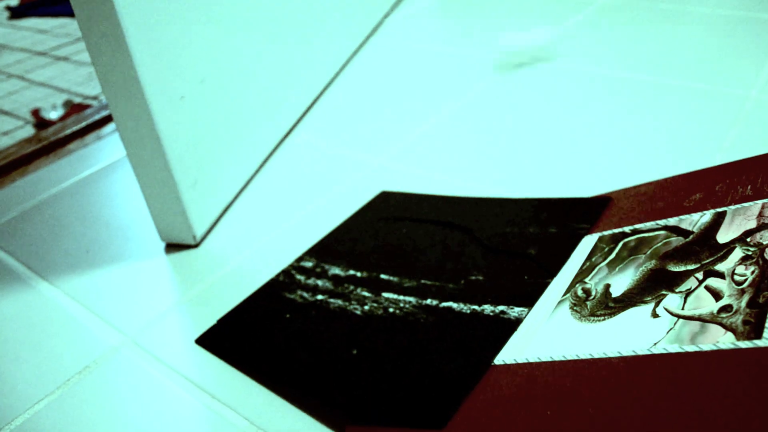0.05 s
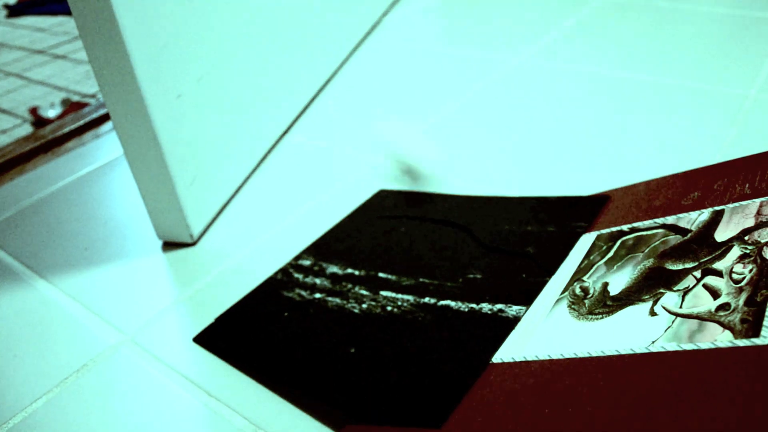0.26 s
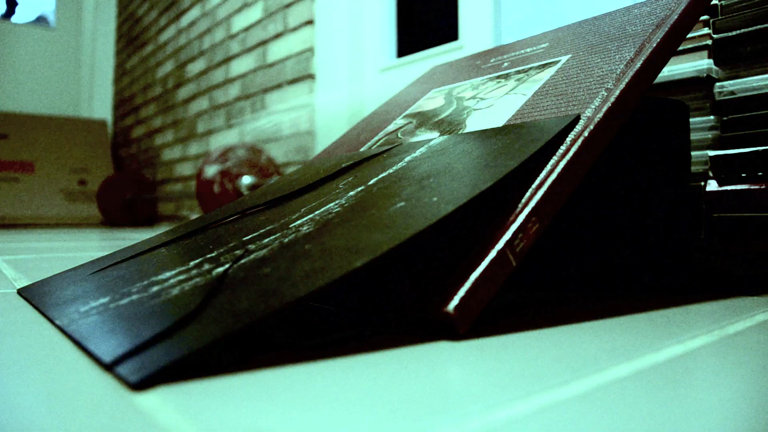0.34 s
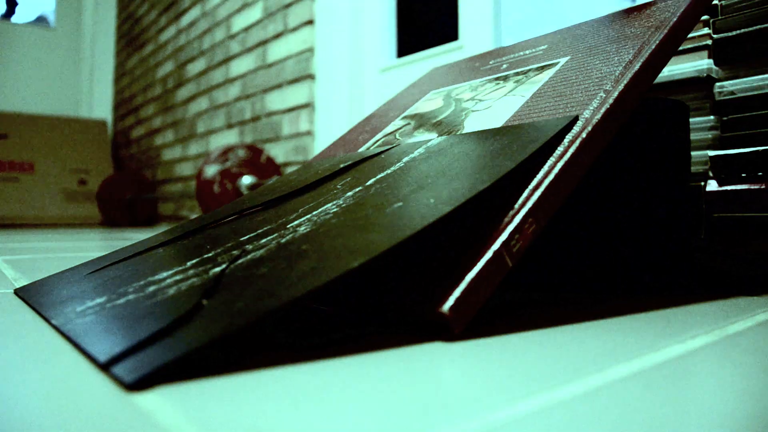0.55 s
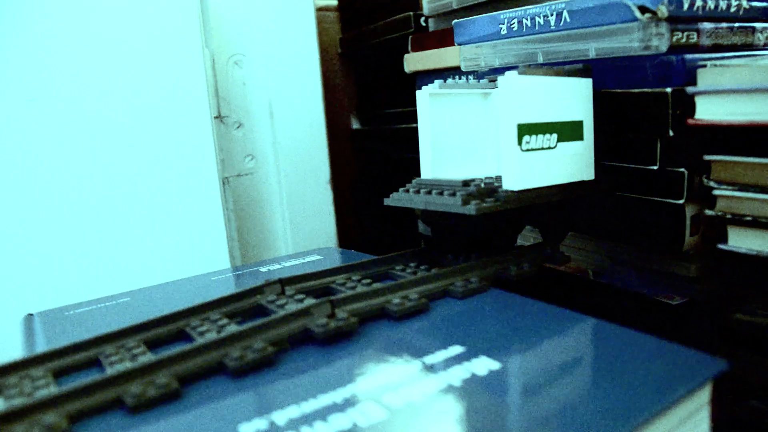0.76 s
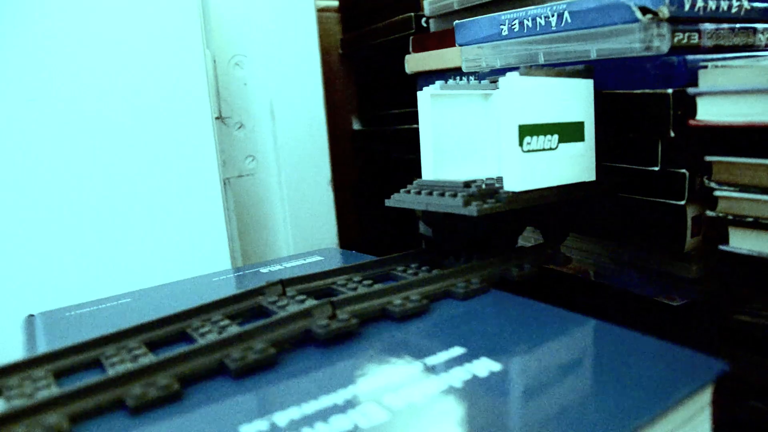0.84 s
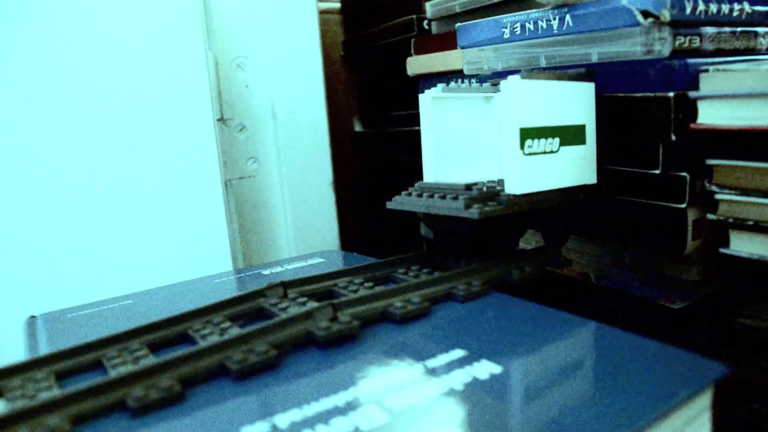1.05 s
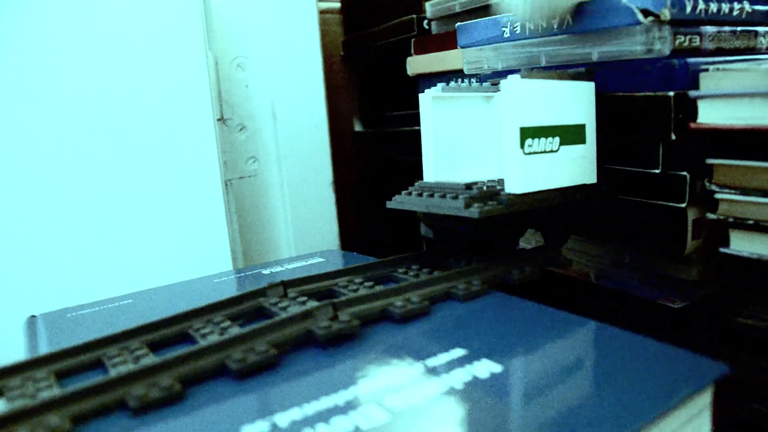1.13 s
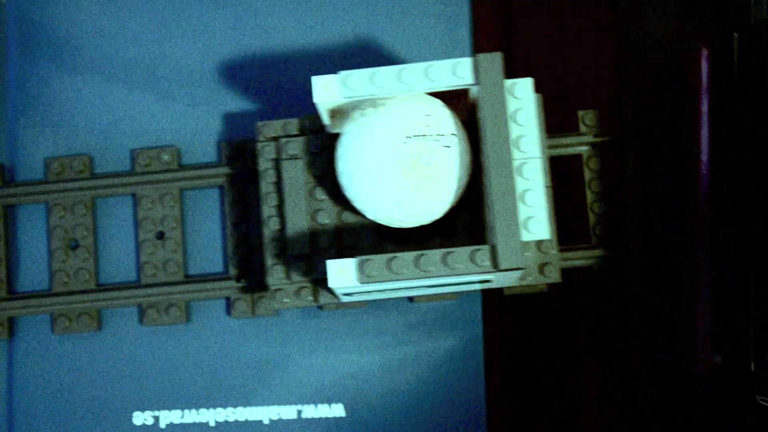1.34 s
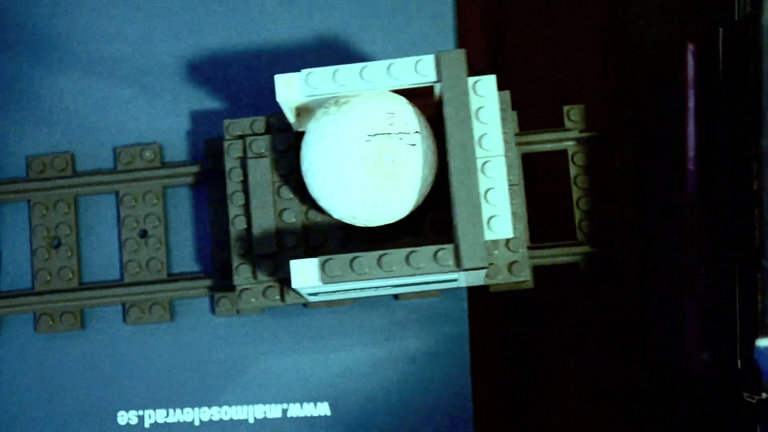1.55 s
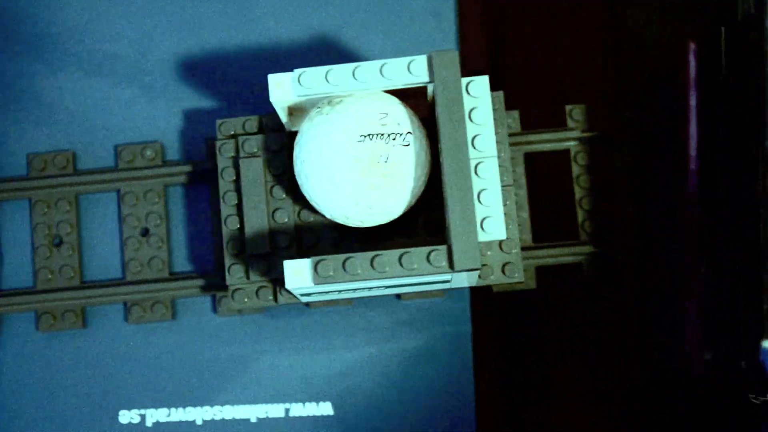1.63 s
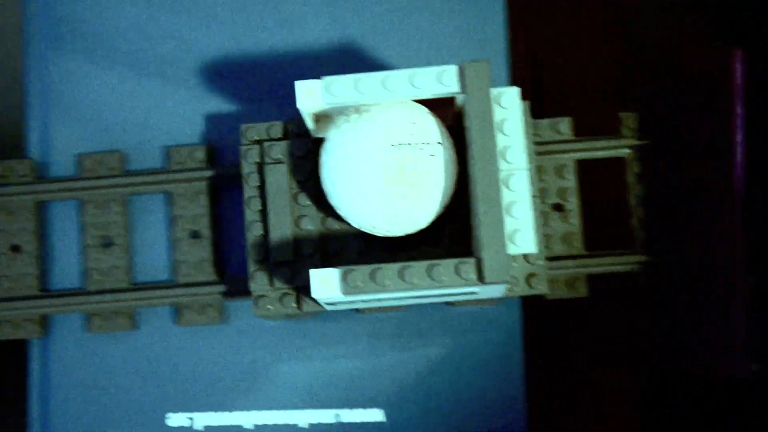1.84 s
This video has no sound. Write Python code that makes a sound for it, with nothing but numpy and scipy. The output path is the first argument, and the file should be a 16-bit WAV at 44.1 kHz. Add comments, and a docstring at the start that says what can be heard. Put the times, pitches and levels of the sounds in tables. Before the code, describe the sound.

A light ball bounces hard on a tiled floor, knocks and thumps on a ramp of books, then rattles briefly into a plastic toy wagon. The room reverberates, and the loudest blows overload a small microphone.

```python
"""A light ball bounces hard on a tiled floor, knocks on a ramp of books and rattles in a plastic toy wagon.
Each impact is a contact pulse with a spray of dense vibration; some also excite the damped modes of ball,
ramp, plastic bricks or room. Reverberation follows, and three times the ringing is cut short. Faint air
noise, mains hum and a thin whine lie beneath. The loudest blows overload a small microphone."""
import sys
import numpy as np
from scipy import signal
from scipy.fft import rfft, irfft
from scipy.io import wavfile

SR = 44100
rng = np.random.default_rng(int(sys.argv[2]) if len(sys.argv) > 2 else 0)


def unload_audio(sound):
    """Save the sound as a 16-bit wav file, at the path given as the first command line argument."""
    columns = np.transpose(np.atleast_2d(sound))
    # keep every value between -1 and 1, then stretch to whole-number steps
    steps = np.round(np.clip(columns, -1, 1) * 32767)
    wavfile.write(sys.argv[1], SR, steps.astype(np.int16))


N = 83790

FLOOR_END_S, RAMP_END_S, WAGON_END_S, FLOOR_FADE_S = 0.404, 0.801, 1.427, 0.013
# reverberation of the room and of the nook around the wagon (frequency [Hz], T60 [s])
ROOM_DECAY = [(100, 1), (350, 0.78), (800, 0.57), (2000, 0.51), (5500, 0.5), (9000, .38), (15000, 0.18)]
NOOK_DECAY = [(200, 0.35), (1400, 0.37), (13000, 0.18)]


def amp(db):
    """Amplitude grows tenfold every 20 dB."""
    return 10 ** (np.asarray(db) / 20)


def unit(x):
    """Normalisation to an energy of 1."""
    return x / np.sqrt(np.sum(x ** 2) + 1e-20)


def curve_at(points, hz):
    """Interpolation on a logarithmic frequency axis."""
    f, value = np.transpose(points)
    return np.interp(np.log(hz + 1), np.log(f + 1), value)


def add(mix, s, sound):
    """Superposition: the sound joins the mix at time s."""
    part = mix[max(round(s * SR), 0):][:len(sound)]
    part += sound[:len(part)]


def until(s, fade_s=0.0012):
    """Gating: a gain that falls linearly from 1 to 0 around time s."""
    return np.clip((s - np.arange(N) / SR) / fade_s + .5, 0, 1)


def hiss(colour):
    """Spectral shaping of white noise, at an rms of 1."""
    gain = amp(curve_at(colour, np.fft.rfftfreq(N, 1 / SR)))
    return unit(irfft(rfft(rng.standard_normal(N)) * gain, N)) * np.sqrt(N)


def contact_pulse(colour, size=4096):
    """Minimum phase gives the shortest causal pulse with a given spectrum."""
    log_gain = np.log(amp(curve_at(colour, abs(np.fft.fftfreq(size, 1 / SR)))))
    spectrum = np.exp(np.conj(signal.hilbert(log_gain)))
    return unit(np.fft.ifft(spectrum).real[:size // 2])


def ring(modes):
    """Free vibration: a struck body sums damped sines and radiates little below its lowest mode."""
    t = np.arange(SR) / SR
    x = sum(amp(db - 60 * t / t60) * np.sin(2 * np.pi * hz * t) for hz, db, t60 in modes)
    return unit(signal.lfilter(*signal.butter(2, modes[0][0] / 2, "high", fs=SR), x))


def spray(t60):
    """Modal overlap: dense vibration merges into a short, spectrally flat noise."""
    fade = amp(-60 * np.arange(SR) / SR / t60)
    spectrum = rfft(rng.standard_normal(SR) * fade)
    whitened = irfft(spectrum / (abs(spectrum) + 1e-12), SR)
    return unit(whitened * np.sqrt(fade))


def diffuse_tail(decay, build_s=0.0017):
    """A diffuse field builds quickly, then dies exponentially, each band at its own rate."""
    hz, t, bands = signal.stft(rng.standard_normal(SR), SR, nperseg=256)
    bands = bands * amp(-60 * t / curve_at(decay, hz)[:, None])
    tail = signal.istft(bands, SR, nperseg=256)[1][:SR]
    return tail * (1 - np.exp(-np.arange(SR) / SR / build_s))


def strike(blows, colour, decay, room_db, spray_s, spray_db,
           dull_hz=SR / 3, modes=None, ring_db=0, echoes=(), spread=0):
    """Impact response: pulse, spray and modes form the direct sound; its reflections are duller."""
    out, contact = np.zeros(N), contact_pulse(colour)
    absorption = signal.butter(1, dull_hz, fs=SR)
    for s, db in blows:
        direct = amp(spray_db) * unit(signal.fftconvolve(spray(spray_s), contact)[:SR])
        add(direct, 0, contact)
        direct = unit(direct)
        if modes:
            detuned = [(hz * (1 + spread * rng.standard_normal()), level, t60)
                       for hz, level, t60 in modes]
            direct = unit(direct + amp(ring_db) * ring(detuned))
        reverb = signal.fftconvolve(diffuse_tail(decay), contact)[:SR]
        reverb = unit(signal.lfilter(*absorption, reverb))
        gain = amp(db) * np.sqrt(SR / 100)  # level as if the direct energy filled 10 ms
        add(out, s, gain * (direct + amp(room_db) * reverb))
        for delay, echo_db in echoes:
            direct = signal.lfilter(*absorption, direct)
            add(out, s + delay, gain * amp(echo_db) * direct)
    return out


def room_air():
    """Broadband ambient noise, which steps down as the floor's and the wagon's ringing end."""
    # noise spectra, early and late (frequency [Hz], relative density [dB])
    early_colour = [(40, -4.5), (500, 2), (1460, -13.5), (3100, -11), (5300, -27), (9600, -21.5),
                    (15000, -43.5)]
    late_colour = [(30, -36.5), (90, 0.5), (160, -12.5), (280, -7), (900, -14.5), (1350, -11.5),
                   (2200, -15), (3500, -21.5), (5000, -24.5), (15000, -40.5)]
    opening, ending = until(FLOOR_END_S, FLOOR_FADE_S), 1 - until(WAGON_END_S)
    early = amp(-49) * hiss(early_colour) * opening
    late = amp(-59 - ending) * hiss(late_colour) * (1 - opening)
    return early + late


def electrical_tones():
    """Pure tones: steady mains hum and a thin whine that jumps in pitch, then stops."""
    # hum and whines (start [s], end [s], frequency [Hz], rms level [dB])
    tones = [(0, 1.9, 100, -71), (0, .39, 14200, -78), (.39, .8, 11790, -73), (.8, 1.427, 15719, -66)]
    out = np.zeros(N)
    for start, end, hz, db in tones:
        gate = until(end) - until(start)
        out += gate * amp(db) * np.sqrt(2) * np.sin(2 * np.pi * hz * np.arange(N) / SR)
    return out


def faint_ticks():
    """Brief contacts have broad spectra and are heard as ticks."""
    # contacts (time [s], level [dB])
    blows = [(.035, -52), (.0928, -41.5), (.2058, -37.5), (.3478, -38.5)]
    # contact spectrum (frequency [Hz], level [dB])
    colour = [(150, -11), (700, 14), (1400, -1), (3300, -3.5), (5300, -7), (7500, -2.5), (10500, -0.5),
              (15000, -29)]
    return strike(blows, colour, ROOM_DECAY, room_db=-1.5, spray_s=0.014, spray_db=2)


def floor_bounce():
    """The ball slams on the tiles, exciting early reflections and the room's standing waves."""
    # impact (time [s], level [dB])
    blows = [(0.2245, -4)]
    # contact spectrum (frequency [Hz], level [dB])
    colour = [(60, -34.5), (180, -18), (370, -10), (720, 2), (1150, -3), (1600, -16), (3300, -25.5),
              (5200, -39.5), (9000, -34), (15000, -58)]
    # ever duller reflections from door and walls (delay [s], gain [dB])
    echoes = [(.0062, 6), (.0082, 0.5), (.0217, -5), (.0296, -8), (.0455, -16), (.0635, -12), (.074, -10.5)]
    # standing waves (frequency [Hz], relative level [dB])
    room_modes = [(118, -24.5), (238, -15.5), (370, -9.5), (500, -1.5), (535, -4.5), (644, -2), (767, -1),
                  (882, -6), (944, -13.5), (1008, -9.5), (1096, -15), (1272, -11.5)]
    out = strike(blows, colour, ROOM_DECAY, room_db=1, spray_s=0.015, spray_db=1.5,
                 dull_hz=5500, echoes=echoes)
    resonance = ring([(hz, db, curve_at(ROOM_DECAY, hz)) for hz, db in room_modes])
    add(out, blows[0][0], amp(26) * resonance)
    return -out  # inverted polarity


def distant_knocks():
    """Beyond the critical distance, reverberation outweighs the direct sound."""
    # impacts (time [s], level [dB])
    blows = [(.366, -21), (.378, -14)]
    # contact spectrum (frequency [Hz], level [dB])
    colour = [(50, -30), (110, -17.5), (330, -8.5), (520, 7.5), (750, -1.5), (3300, -13.5), (4300, -23.5),
              (5600, -20.5), (9000, -27.5), (13000, -49)]
    return strike(blows, colour, ROOM_DECAY, room_db=4, spray_s=0.054, spray_db=33)


def ramp_thump(rebound_s=0.5332):
    """Heavy damping makes the books thump; a soft rebound stirs only their two lowest modes."""
    # impact (time [s], level [dB])
    blows = [(.4741, -6)]
    # contact spectrum (frequency [Hz], level [dB])
    colour = [(120, -23.5), (240, -1), (480, 2.5), (900, -7), (2000, -11.5), (5000, -21.5), (9500, -28),
              (15000, -55)]
    # ramp resonances (frequency [Hz], relative level [dB], T60 [s])
    modes = [(251, -3, 0.0363), (609, 4, 0.035), (1190, -5.5, .055)]
    out = strike(blows, colour, ROOM_DECAY, room_db=-5.5, spray_s=0.024, spray_db=15.5,
                 dull_hz=3800, modes=modes, ring_db=2)
    add(out, rebound_s, amp(8.5) * ring(modes[:2]))
    return out


def hard_clack():
    """A hard contact also excites high modes, which decay faster than the low ones."""
    # impact (time [s], level [dB])
    blows = [(.7057, -13)]
    # contact spectrum (frequency [Hz], level [dB])
    colour = [(50, -23.5), (260, 2.5), (700, 2), (1300, -8), (3300, -7), (4200, -12.5), (5000, -8.5),
              (7700, -20), (11000, -38.5)]
    # resonances (frequency [Hz], relative level [dB], T60 [s])
    modes = [(242.3, -12.5, .2), (305.5, -11, .2), (730, -2.5, 0.081), (3190, -8, .015), (4840, 0, 0.01207),
             (5350, -1.5, .012)]
    return strike(blows, colour, ROOM_DECAY, room_db=-0.5, spray_s=0.022, spray_db=13.5,
                  dull_hz=9480, modes=modes, ring_db=0.5)


def light_tap(tap_s=1.1515):
    """A soft touch is heard as free vibration alone, with no click."""
    # resonances (frequency [Hz], relative level [dB], T60 [s])
    modes = [(285, 1, 0.06), (1226, 2.5, 0.048), (2220, -2.5, 0.037)]
    out = np.zeros(N)
    add(out, tap_s, amp(-20) * ring(modes))
    return out


def ball_rattle():
    """The hollow ball's resonance rises as it settles in the wagon; soft knocks ring more than click."""
    # impacts (time [s], level [dB])
    blows = [(1.2483, -13.5), (1.2513, -17.5), (1.2624, -22), (1.279, -25.5), (1.2871, -32),
             (1.2944, -34.5), (1.3356, -24.5), (1.358, -29.5), (1.375, -31), (1.3881, -25.5)]
    # contact spectrum (frequency [Hz], level [dB])
    colour = [(220, -25), (420, -2.5), (800, -16), (1300, 5), (2000, -3.5), (2900, -13.5), (10000, -17.5),
              (15000, -37.5)]
    # course of the hollow ring (time [s], pitch [Hz], T60 [s])
    hollow_ring = [(1.2477, 1265, .032), (1.3882, 1470, .07)]
    # ball resonances (multiple of the pitch [1], relative level [dB])
    partials = [(1, 2), (1.19, -9), (2.8, -11)]
    out, hardest_db = np.zeros(N), max(db for s, db in blows)
    times, pitches, t60s = np.transpose(hollow_ring)
    for s, db in blows:
        hz, t60 = np.interp(s, times, pitches), np.interp(s, times, t60s)
        modes = [(multiple * hz, mode_db, t60) for multiple, mode_db in partials]
        out += strike([(s, db)], colour, NOOK_DECAY, room_db=-10, spray_s=0.044, spray_db=4.5,
                      modes=modes, ring_db=0.5 * (hardest_db - db))
    return out


def brick_clatter():
    """Plastic bricks in the wagon resonate; each blow hits another, with slightly different pitches."""
    # impacts (time [s], level [dB])
    blows = [(1.2735, -27.5), (1.3043, -13), (1.3074, -19.5), (1.312, -20.5), (1.3348, -29.5), (1.338, -27),
             (1.36, -32), (1.3878, -27.5)]
    # contact spectrum (frequency [Hz], level [dB])
    colour = [(60, -23.5), (250, -2.5), (1600, -1), (4900, -5), (5650, -11), (6500, -7), (11500, -10.5),
              (15000, -39)]
    # resonances of a typical brick (frequency [Hz], relative level [dB], T60 [s])
    modes = [(1506, 2, 0.41), (1932, 3, 0.077), (2475, 5, .07), (2870, -2, 0.46), (3040, 5.4, .12),
             (5080, 6.5, .05), (6550, 2.5, 0.12), (7670, 5, .06)]
    return strike(blows, colour, NOOK_DECAY, room_db=-8, spray_s=0.033, spray_db=12.5,
                  modes=modes, ring_db=-3, spread=0.025)


def settling_tap():
    """The ball comes to rest with one weak impact, nearly all dense vibration."""
    # impact (time [s], level [dB])
    blows = [(1.5298, -45.5)]
    # contact spectrum (frequency [Hz], level [dB])
    colour = [(300, -29), (1000, -2), (1600, 6), (3300, -10.5), (4700, -6.5), (14000, -24)]
    return strike(blows, colour, NOOK_DECAY, room_db=-18, spray_s=0.077, spray_db=31)


def scene():
    """Superposition in mono; floor, ramp and wagon sounds are each gated off while still ringing."""
    floor = (faint_ticks() + floor_bounce()) * until(FLOOR_END_S, FLOOR_FADE_S)
    ramp = (distant_knocks() + ramp_thump() + hard_clack()) * until(RAMP_END_S)
    wagon = (light_tap() + ball_rattle() + brick_clatter()) * until(WAGON_END_S)
    return (floor + ramp + wagon + settling_tap() + room_air() + electrical_tones())[None]


def record(dry):
    """Saturation: the microphone loses deep bass and flattens the peaks; a band limit follows."""
    low_cut_hz, edge_hz, ceiling, knee = 110, 16500, 0.94, 7
    thin = signal.lfilter(*signal.butter(1, low_cut_hz, "high", fs=SR), dry)
    clipped = thin / (1 + abs(thin / ceiling) ** knee) ** (1 / knee)
    band_limit = signal.firwin(511, edge_hz, window=("kaiser", 9), fs=SR)
    return signal.oaconvolve(clipped, band_limit[None], "same")


dry = scene()
out = record(dry)
unload_audio(out)
```